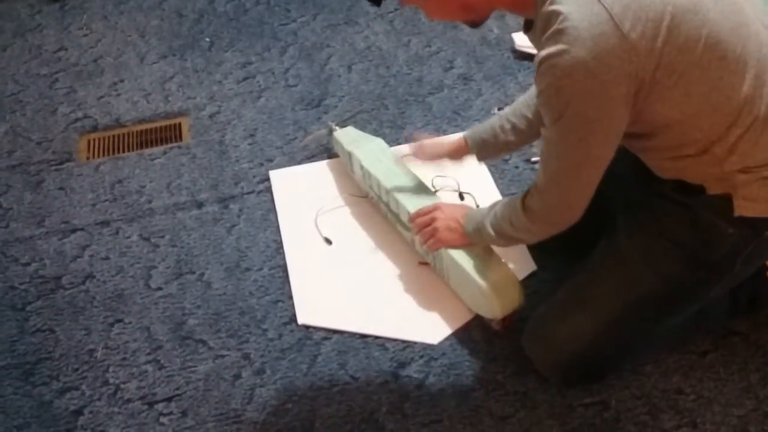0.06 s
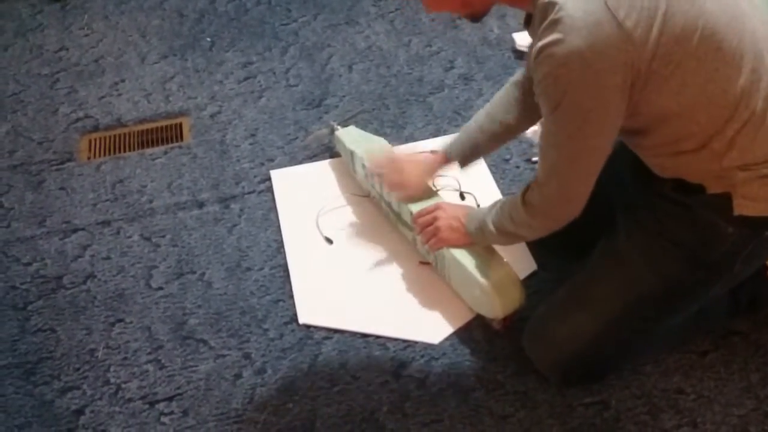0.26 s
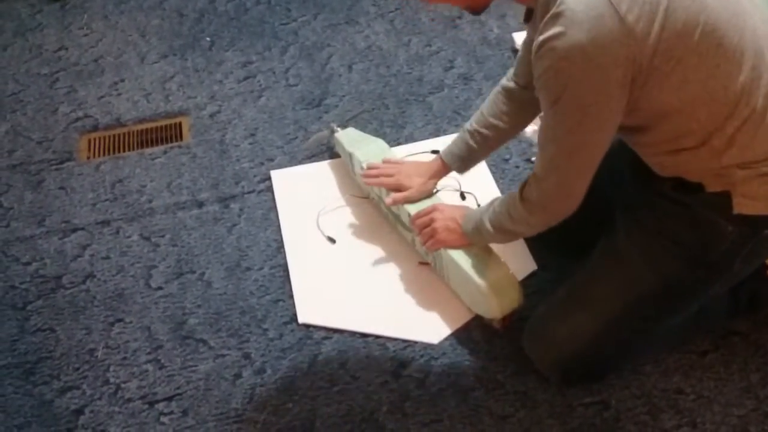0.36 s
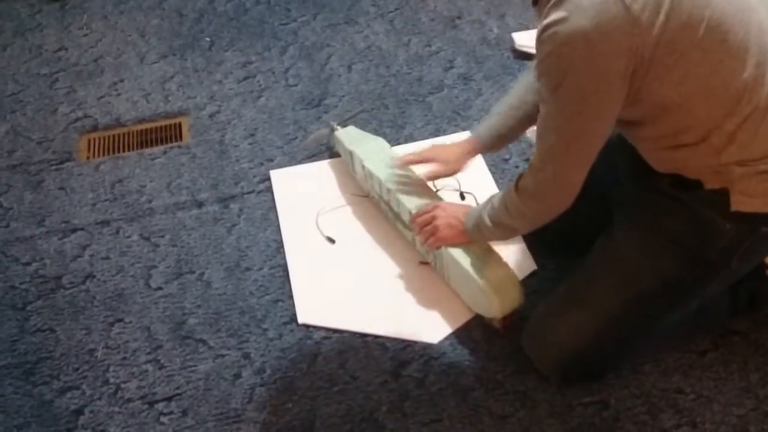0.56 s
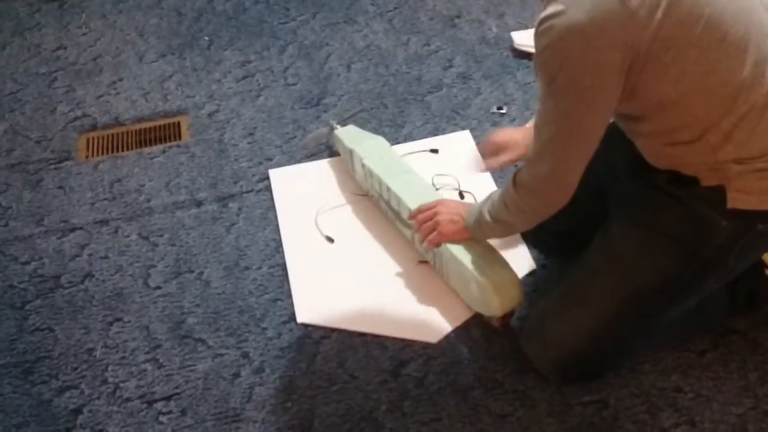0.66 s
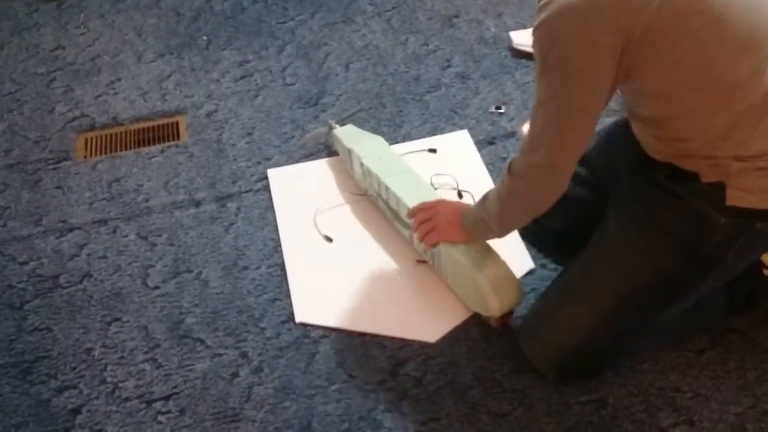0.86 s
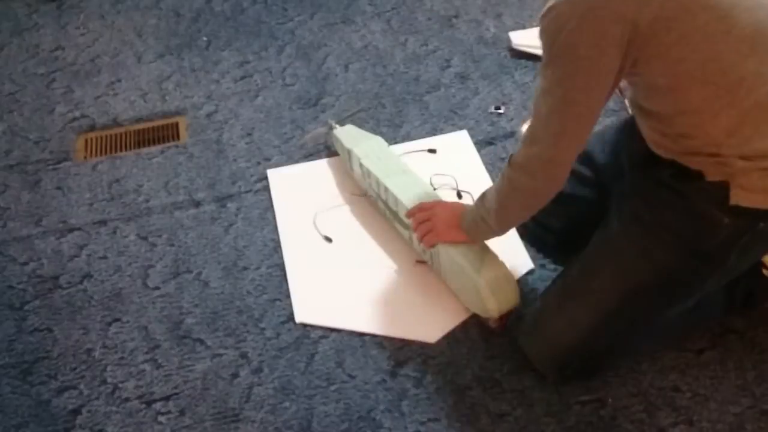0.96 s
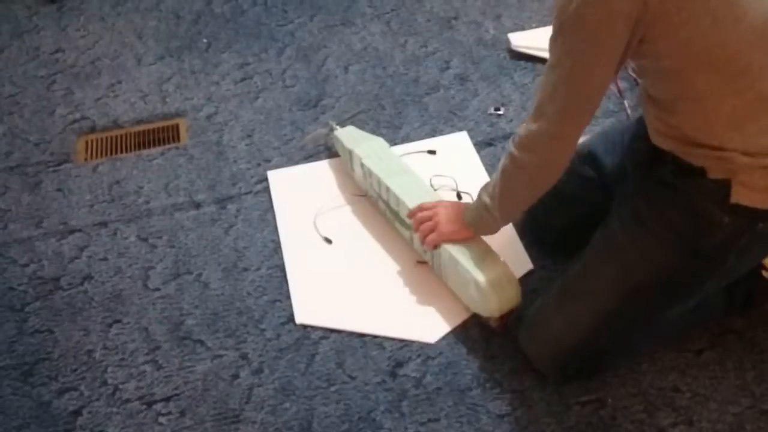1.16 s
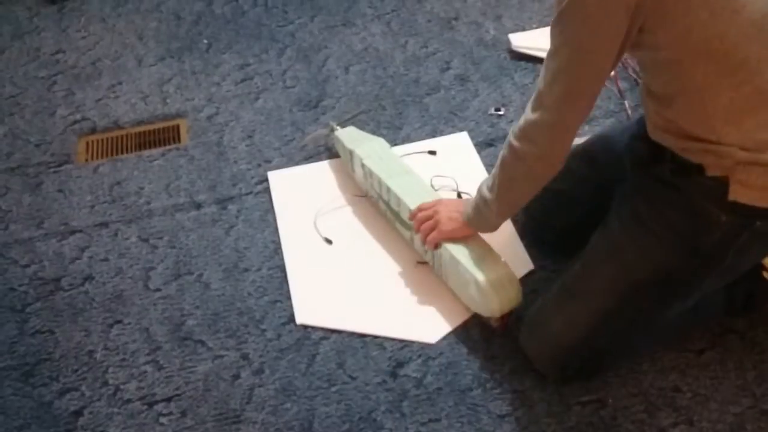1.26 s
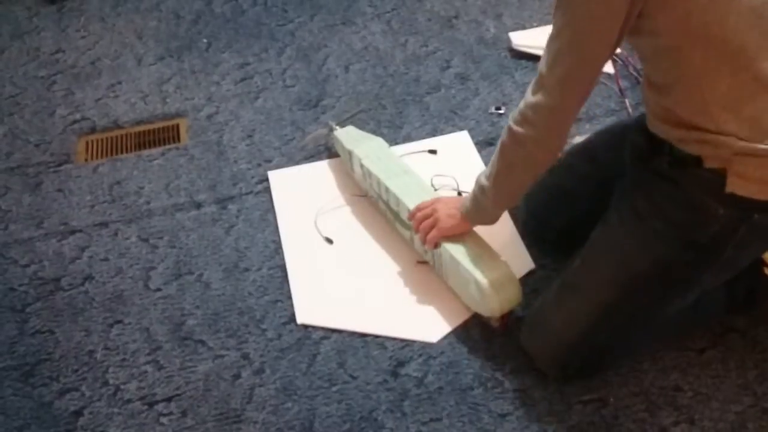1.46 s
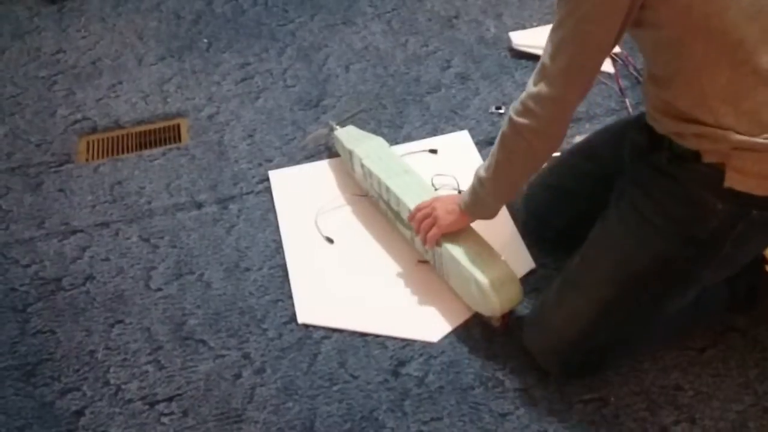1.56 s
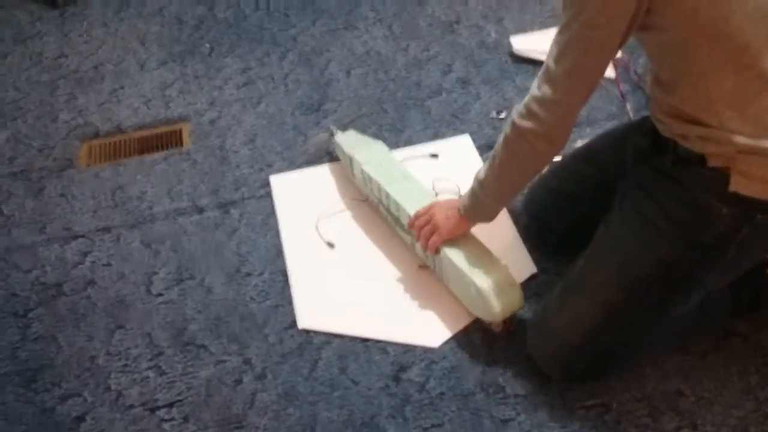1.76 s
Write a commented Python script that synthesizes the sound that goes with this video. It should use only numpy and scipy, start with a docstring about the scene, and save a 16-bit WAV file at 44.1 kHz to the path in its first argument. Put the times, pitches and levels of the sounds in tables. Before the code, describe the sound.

A palm slaps a hollow foam model aircraft and its hatch snaps shut, amid faint clicks.

```python
"""Closing the hatch on a foam fuselage

A foam model fuselage is handled on a sheet of board on a carpeted floor, in a small room.
A palm slaps its top and the hatch snaps home just after; the hollow body rings and the floor thumps.
Small plastic parts click, and hands and sleeves rustle over the foam, above a faint hum."""
import sys
import numpy as np
from scipy import signal
from scipy.fft import rfft, irfft, next_fast_len
from scipy.io import wavfile
from scipy.ndimage import uniform_filter1d

SR = 44100
rng = np.random.default_rng(int(sys.argv[2]) if len(sys.argv) > 2 else 0)


def master_out(mix):
    """Clip the mix to full scale and print it as 16-bit PCM to the path in sys.argv[1]."""
    frames = np.transpose(np.atleast_2d(mix))
    ceiling = np.clip(frames, -1, 1)
    pcm = np.round(ceiling * 32767).astype(np.int16)
    wavfile.write(sys.argv[1], SR, pcm)


N = 79380
TIME = np.arange(N) / SR
FFT_SIZE = 2 * next_fast_len(N)
FREQS = np.maximum(np.arange(FFT_SIZE // 2 + 1) * SR / FFT_SIZE, 1)
SLAP_AT_S, SNAP_AT_S = 0.2162, 0.2323


def from_db(db):
    """Decibels to gain."""
    return 10 ** (np.asarray(db) / 20)


def unit_rms(x):
    """Scale to unit rms."""
    return x / np.sqrt(np.mean(x ** 2) + 1e-20)


def curve(points):
    """Join breakpoints on a log-frequency axis, one value per FFT bin."""
    hz, value = np.transpose(points)
    return np.interp(np.log(FREQS), np.log(hz), value)


def colour(x, db):
    """Minimum-phase EQ, so nothing rings ahead of an attack."""
    cepstrum = irfft(np.log(from_db(db)))
    cepstrum[1:FFT_SIZE // 2] *= 2
    cepstrum[FFT_SIZE // 2 + 1:] = 0
    return irfft(rfft(x, FFT_SIZE) * np.exp(rfft(cepstrum)))[..., :N]


def low_cut(x, hz, order):
    """Roll off the lows."""
    return signal.sosfilt(signal.butter(order, hz, "high", fs=SR, output="sos"), x + 1e-18)


def flatten(x, bins):
    """Level a burst's broad spectral peaks and dips; unit energy."""
    power = uniform_filter1d(np.abs(rfft(x, FFT_SIZE)) ** 2, bins)
    return colour(x, -10 * np.log10(np.maximum(power, 1e-12)))


def pan(x, db):
    """Place a sound left (+) or right (-)."""
    return x * from_db([[db / 2], [-db / 2]])


def lean(x, balance):
    """Pan by frequency: opposite EQ on the two channels."""
    half_db = curve(balance) / 2
    return np.array([colour(x[0], half_db), colour(x[1], -half_db)])


def impulse(at_s):
    """One sharp contact."""
    return 1. * (np.arange(N) == int(at_s * SR))


def crunch(peak_s, rise_s, fall_s):
    """A noise burst that swells and dies like a spray of tiny fractures; unit energy."""
    swell = np.exp(-np.abs(TIME - peak_s) / np.where(TIME < peak_s, rise_s, fall_s))
    return unit_rms(rng.standard_normal(N) * swell) / np.sqrt(N)


def ring(start_s, modes):
    """Damped modes struck together."""
    age = np.maximum(TIME - start_s, 0)
    return sum(from_db(db - 60 * age / t60) * np.sin(2 * np.pi * hz * age) for hz, db, t60 in modes)


def diffuse_noise():
    """White stereo noise, alike in the bass and wide in the treble."""
    # how alike the channels are: freq_hz, correlation
    likeness = [(100, 0.5), (500, 0.6), (1200, -0.2), (3000, 0.13), (6000, -0.38), (14000, -0.11)]
    alike = np.clip(curve(likeness), -.98, .98)
    mid = colour(rng.standard_normal(N), 10 * np.log10((1 + alike) / 2))
    side = colour(rng.standard_normal(N), 10 * np.log10((1 - alike) / 2))
    return np.array([mid + side, mid - side])


def room_tone():
    """A bed of quiet air and a low hum."""
    # tone of the air: freq_hz, gain_db
    air_eq = [(20, -26.5), (35, -16), (60, -4), (100, -5.5), (180, -11.5), (250, -14), (340, -7.5),
              (455, -14), (1200, -8), (2420, -8.5), (3980, -7), (7460, -19.5), (15500, -17)]
    air_db, hum_db, hum_hz = -65, -79.5, 123
    air = from_db(air_db) * unit_rms(colour(diffuse_noise(), curve(air_eq)))
    hum = from_db(hum_db) * np.sqrt(2) * np.sin(2 * np.pi * hum_hz * TIME)
    return pan(air + hum, db=-2.5)


def stroke(peak_s, rise_s, fall_s, eq_db):
    """Friction: dense stick-slip grains and hiss that swell and fade."""
    grains_per_s, spread_db, hiss_gain = 2800, 3.5, 0.65
    slips = (rng.random(N) < grains_per_s / SR) * rng.choice([-1, 1], N)
    grains = slips * from_db(spread_db * np.minimum(rng.exponential(1, N), 4))
    friction = unit_rms(grains) + hiss_gain * rng.standard_normal(N)
    age = TIME - peak_s
    swell = np.exp(-np.where(age < 0, (age / rise_s) ** 2, age / fall_s))
    return swell * unit_rms(colour(friction, eq_db))


def hand_rubs():
    """Hands and sleeves brush the foam, each stroke with its own bass and treble."""
    # strokes: peak_s, rise_s, fall_s, level_db, bass_db, treble_db, pan_db
    rubs = [(0.004, 0.042, 0.037, -53, 7.5, 3, -2), (0.14, 0.019, 0.017, -56.5, 3.5, 6, -1.5),
            (0.388, 0.03, 0.028, -53.5, 12.5, 5.5, 1), (0.538, 0.042, 0.048, -55, 1, 3, 0.5),
            (0.704, 0.034, 0.046, -57, -1.5, 1.5, -1), (0.778, 0.0071, 0.013, -50, -4.5, 3.5, 0.5),
            (0.844, 0.0072, 0.013, -60, 0, 3.5, -3), (0.946, 0.023, 0.05, -56, 10, 5.5, -1),
            (1.112, 0.032, 0.019, -59, 4, -3.5, 0), (1.189, 0.015, 0.02, -56.5, -15, -2, -4),
            (1.278, 0.0064, 0.044, -55.5, 7, -2, 0.5), (1.309, 0.023, 0.04, -56.5, 1, -2, -6),
            (1.384, 0.017, 0.01, -59, 4, -4, -0.5), (1.434, 0.053, 0.046, -60, 0.5, -7, -0.5),
            (1.545, 0.066, 0.026, -61, 2.5, -8.5, -2), (1.572, 0.018, 0.027, -55, -3, -10.5, 0),
            (1.71, 0.044, 0.014, -64, -13.5, -6.5, -1.5), (1.751, 0.016, 0.017, -50.5, 0, 0.5, -1.5)]
    # tone of rubbed foam: freq_hz, gain_db
    rub_eq = [(60, -9.5), (300, -22), (800, -11), (1400, -8), (2100, 3.5), (3000, 3), (4300, 3), (5800, -3),
              (7200, -7), (10000, -11), (12500, -11), (15500, -10)]
    bass_hz, treble_hz = 1510, 6100
    bass_shelf = 1 / (1 + (FREQS / bass_hz) ** 4)
    treble_shelf = 1 / (1 + (treble_hz / FREQS) ** 4)
    rustle = 0
    for peak_s, rise_s, fall_s, level_db, bass_db, treble_db, pan_db in rubs:
        eq_db = curve(rub_eq) + bass_db * bass_shelf + treble_db * treble_shelf
        rustle += pan(from_db(level_db) * stroke(peak_s, rise_s, fall_s, eq_db), pan_db)
    return rustle


def plastic_clicks():
    """Small parts click: a gritty tick, a low ring and a short high ring at each click's own pitch."""
    # clicks: start_s, level_db, low_ring_db, high_ring_db, high_pitch_hz, pan_db
    clicks = [(0.0337, -41, -19, -27, 4160, 22), (0.0662, -34.5, -15, -27, 4200, 6),
              (0.1053, -32.5, 16, 8.5, 4130, 1), (0.129, -35.5, -8, 3, 4200, -10),
              (0.1328, -34.5, 17, 10, 4130, 4), (0.3249, -39.5, 27.5, 20, 2920, -3),
              (0.3812, -36.5, 8.5, -8, 4160, -16.5), (0.7004, -32.5, -1, -8, 4340, -1),
              (0.7437, -33, -17, -1.5, 4250, 6), (0.7670, -27.5, -3, 2.5, 4370, -1.5),
              (1.19, -31.5, 0, 11.5, 4300, 2), (1.2745, -39.5, 2, 2, 4670, -17.5),
              (1.7320, -33.5, 2, 9.5, 4850, 3), (1.7353, -25, 9, 3.5, 4760, 3),
              (1.7410, -38, 4.5, 12, 4800, -2)]
    # low ring of the plastic: pitch_hz, gain_db, t60_s
    low_modes = [(2367, -29.5, 0.02), (2160, -34, 0.023)]
    # cluster of the high ring: pitch_ratio, gain_db, t60_s
    cluster = [(0.939, -19.5, 0.0048), (1, -19.5, 0.0097), (1.129, -26.5, 0.0051)]
    # tone of the tick: freq_hz, gain_db
    tick_eq = [(300, -22), (1200, 2), (2200, -3), (3200, -6), (4500, -9), (6000, 8.5), (7200, -5.5),
               (10300, 1), (12300, -2.5), (14500, 3.5)]
    ticks, rings = 0, 0
    for start_s, level_db, low_db, high_db, pitch_hz, pan_db in clicks:
        gain = pan(from_db(level_db), pan_db)
        low = from_db(low_db) * ring(start_s, low_modes)
        high_modes = [(pitch_hz * ratio, db, t60) for ratio, db, t60 in cluster]
        high = from_db(high_db) * ring(start_s, high_modes)
        ticks += gain * crunch(start_s, rise_s=0.0005, fall_s=0.001)
        rings += gain * (low + high)
    return colour(ticks, curve(tick_eq)) + low_cut(rings, hz=1800, order=2)


def blow(peak_s, contact_db, crunch_db, rise_s, fall_s):
    """A sharp contact with the crunch of foam around it."""
    force = from_db(contact_db) * impulse(peak_s) + from_db(crunch_db) * crunch(peak_s, rise_s, fall_s)
    return flatten(force, bins=3000) * np.sqrt(np.sum(force ** 2))


def palm_slap():
    """A dull slap on the foam, then its quick echo with a brief ring."""
    # first touch, slap and echo: peak_s, contact_db, crunch_db, rise_s, fall_s
    bursts = [(0.2142, -18.5, -11.5, 0.00018, 0.0014), (0.2163, -2, 4, 0.00036, 0.0034),
              (0.224, -6.5, 3, .0018, .015)]
    # tone of the slap: freq_hz, gain_db
    slap_eq = [(30, -26.5), (60, -10), (130, -5.5), (300, -7), (460, -7), (600, 2), (790, 5.5), (1050, -3),
               (1400, 4.5), (2400, 3), (3050, -2), (4200, -1), (6000, -2), (7500, -9.5), (9000, -9),
               (12000, -11.5), (15500, -9)]
    # brief ring of the echo: pitch_hz, level_db, t60_s
    echo_modes = [(1356, -33, 0.01264), (1850, -37, 0.0052)]
    slap = colour(sum(blow(*burst) for burst in bursts), curve(slap_eq))
    echo_ring = ring(start_s=0.2238, modes=echo_modes)
    return pan(slap + echo_ring, db=1)


def hollow_body():
    """The slap sets the fuselage ringing, and the snap strikes it again more lightly."""
    # modes of the shell: pitch_hz, gain_db, t60_s
    modes = [(600, -50.5, 0.25), (758, -45.5, 0.087), (1374, -35.5, 0.15), (1526, -44, 0.11),
             (1800, -46, 0.18), (2165, -41, .19), (2240, -44, 0.16), (2442, -35, 0.097), (2924, -35.5, .12),
             (4100, -38.5, 0.19), (5390, -35, 0.14), (6160, -37.5, 0.11)]
    slap_db, snap_db = -6, -20.5
    shell = from_db(slap_db) * ring(SLAP_AT_S, modes) + from_db(snap_db) * ring(SNAP_AT_S, modes)
    return pan(shell, db=-3)


def floor_boom():
    """The floor takes up the slap slowly and hums on."""
    # modes of the floor: pitch_hz, gain_db, t60_s
    modes = [(55, -50, 0.68), (88, -41.5, 0.14), (150, -46, 0.14), (170, -51.5, 0.27), (268.5, -48, 0.21)]
    rise_s = 0.04
    swell = 1 - np.exp(-np.maximum(TIME - SLAP_AT_S, 0) / rise_s)
    return pan(swell * ring(SLAP_AT_S, modes), db=-9)


def hatch_snap():
    """The hatch crunches and snaps brightly home, with a quick echo just behind."""
    # crunch, snap and echo: peak_s, contact_db, crunch_db, rise_s, fall_s
    bursts = [(0.2299, 0, 3.5, 0.0029, 0.0013), (0.2325, -1, 9.5, 0.00051, 0.00055),
              (0.2395, -9.5, 0.5, .0012, 0.0028)]
    # tone of the snap: freq_hz, gain_db
    snap_eq = [(100, -25), (800, -12), (1800, -5), (2550, 6), (3100, -1), (4900, -4), (6200, 3.5),
               (7200, -5.5), (9500, -4.5), (12000, -11.5), (15200, -10.5)]
    return colour(sum(blow(*burst) for burst in bursts), curve(snap_eq))


def latch_ping():
    """The latch pings briefly as the hatch closes."""
    # modes of the latch: pitch_hz, level_db, t60_s
    modes = [(2600, -15.5, 0.013), (6120, -18, 0.0085)]
    return pan(ring(SNAP_AT_S, modes), db=-3)


def board_bumps():
    """Board and floor thump dully as the hand presses down and the weight shifts."""
    # thumps: start_s, level_db, pitch_hz, t60_s
    bumps = [(0.252, -44.5, 86, 0.19), (0.338, -46, 56.6, 0.099), (0.505, -66.5, 213, 0.051),
             (1.608, -54.5, 202, 0.045), (1.608, -54.5, 469, 0.015), (1.724, -66, 70.3, 0.18)]
    return pan(sum(ring(start_s, [(hz, db, t60)]) for start_s, db, hz, t60 in bumps), db=-6.5)


def board_scuffs():
    """The fuselage scuffs on the board, each rasp in one broad band."""
    # scuffs: peak_s, rise_s, fall_s, level_db, centre_hz, half_width_octaves
    scuffs = [(1.315, 0.024, 0.029, -56.5, 2600, 0.52), (1.38, 0.015, 0.014, -66.5, 600, 0.9),
              (1.571, 0.012, 0.0081, -56.5, 1440, 0.35)]
    rasp = 0
    for peak_s, rise_s, fall_s, level_db, centre_hz, octaves in scuffs:
        band_db = -10 * np.log10(1 + (np.log2(FREQS / centre_hz) / octaves) ** 4)
        rasp += from_db(level_db) * stroke(peak_s, rise_s, fall_s, band_db)
    return rasp


def near_scatter(x):
    """The direct sound, with treble scatter off the board and arms a moment behind it."""
    decay_s, gain_db = 0.00076, 0.5
    scatter = np.array([crunch(0, decay_s, decay_s) for channel in range(2)])
    scatter = low_cut(scatter, hz=1200, order=1)
    paths = np.array([flatten(impulse(0) + side, bins=600) for side in scatter])
    return from_db(gain_db) * signal.fftconvolve(x, paths, axes=1)[:, :N]


def room_reverb(x):
    """Dense reflections that build up after a short gap and die faster in the treble."""
    # decay by band: centre_hz, t60_s
    decays = [(100, 0.32), (700, 0.28), (2500, 0.24), (6000, 0.23), (15000, 0.15)]
    # tone of the tail: freq_hz, gain_db
    tail_eq = [(60, -3), (300, 6.5), (1000, -1.5), (2500, -5), (4300, -2), (6300, -2.5), (9000, -0.5),
               (15000, 1.5)]
    # stereo lean of the tail: freq_hz, left_minus_right_db
    tail_balance = [(100, -9), (800, 0), (2000, -8.5), (3300, -1.5), (4400, 1), (6200, -4), (8600, 4),
                    (11500, 0), (15000, 0)]
    predelay_s, build_s = 0.00056, 0.0036
    noise_spectrum = rfft(diffuse_noise(), FFT_SIZE)
    age = np.maximum(TIME - predelay_s, 0)
    centres_hz, t60s = np.transpose(decays)
    tail = 0
    for share, t60 in zip(np.eye(len(decays)), t60s):
        crossover = np.interp(np.log(FREQS), np.log(centres_hz), share)
        band = irfft(noise_spectrum * crossover)[:, :N]
        fade = from_db(-60 * age / t60) * (1 - np.exp(-age / build_s))
        tail += band * unit_rms(fade) / np.sqrt(N)
    tail = np.array([flatten(side, bins=170) for side in tail])
    tail = lean(colour(tail, curve(tail_eq)), tail_balance)
    return signal.fftconvolve(x, tail, axes=1)[:, :N]


def scene():
    """Foam and plastic sound close up and through the room; the resonances are mixed in dry."""
    # stereo lean of the close sound: freq_hz, left_minus_right_db
    close_balance = [(100, 2), (1000, -5), (3000, -2.5), (4400, 6.5), (5900, -5), (8700, 10.5), (11500, 7),
                     (15000, -7.5)]
    click_send_db = -2
    foam = palm_slap() + hatch_snap() + hand_rubs() + board_scuffs()
    plastic = plastic_clicks()
    close = lean(near_scatter(foam) + plastic, close_balance)
    reflected = room_reverb(foam + from_db(click_send_db) * plastic)
    resonances = hollow_body() + floor_boom() + latch_ping() + board_bumps()
    return close + reflected + resonances + room_tone()


def record(dry):
    """The microphone drops the deepest bass; the top is cut steeply."""
    cutoff_hz = 15900
    high_cut = signal.ellip(10, .2, 70, cutoff_hz, fs=SR, output="sos")
    return signal.sosfilt(high_cut, low_cut(dry, hz=36, order=3))


dry = scene()
out = record(dry)
master_out(out)
```